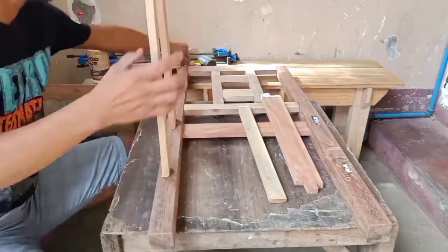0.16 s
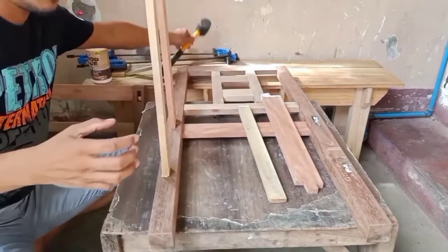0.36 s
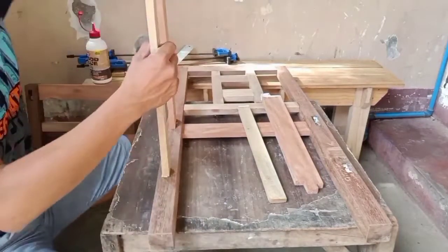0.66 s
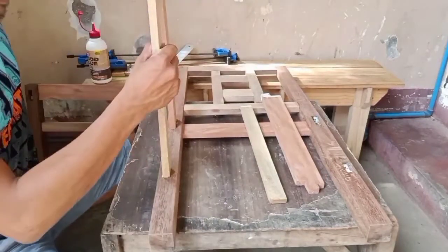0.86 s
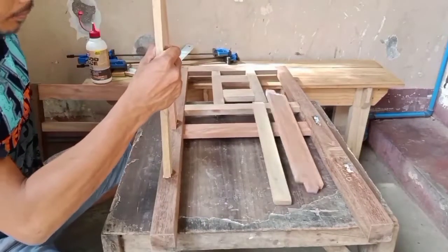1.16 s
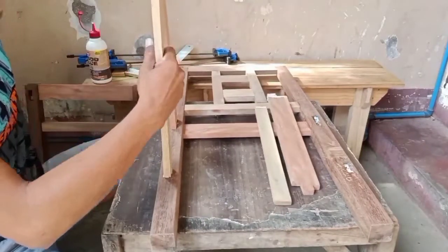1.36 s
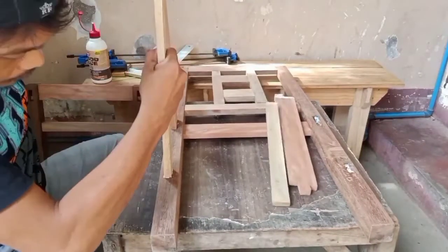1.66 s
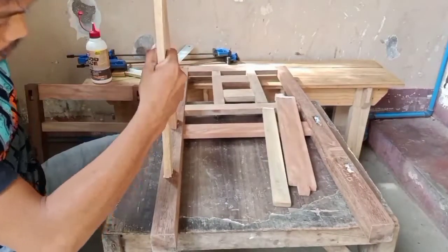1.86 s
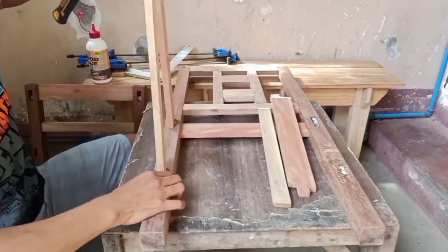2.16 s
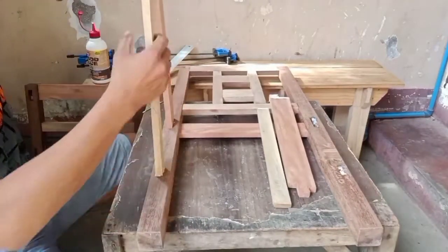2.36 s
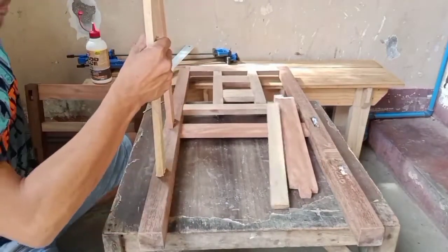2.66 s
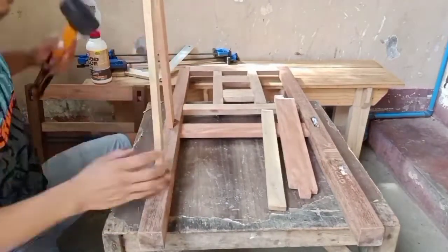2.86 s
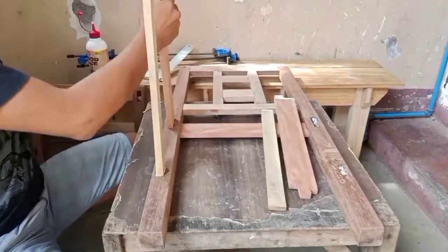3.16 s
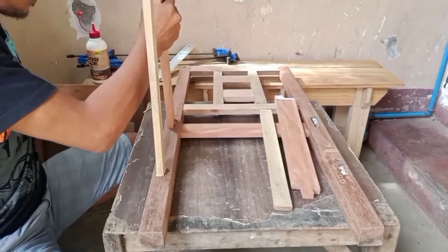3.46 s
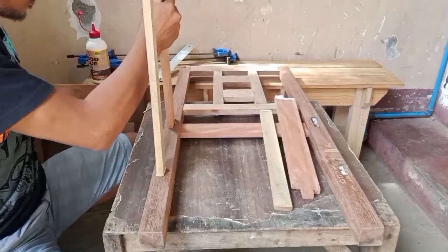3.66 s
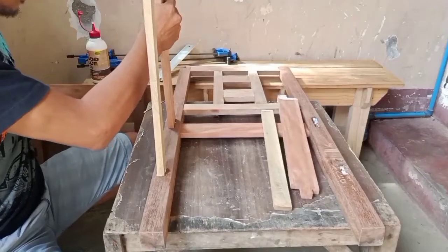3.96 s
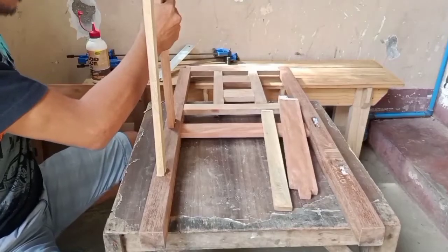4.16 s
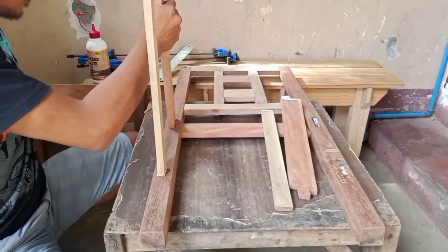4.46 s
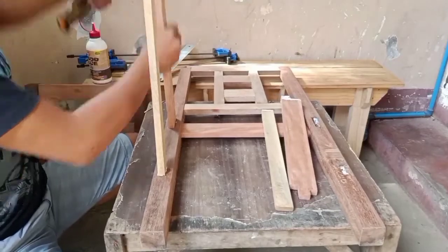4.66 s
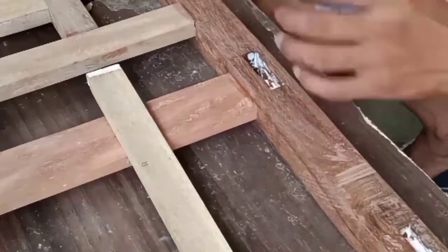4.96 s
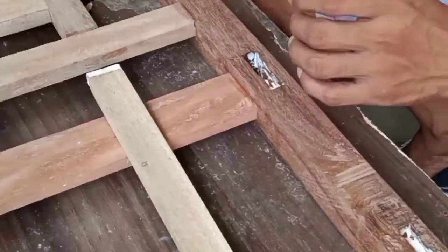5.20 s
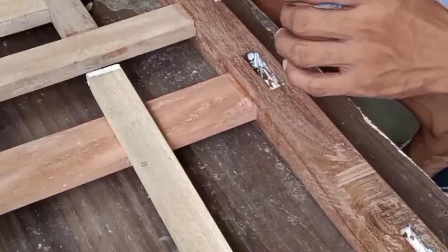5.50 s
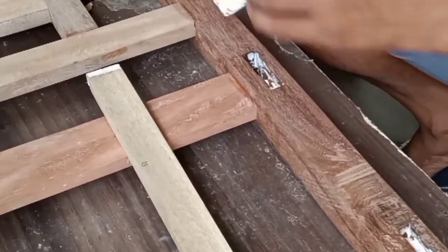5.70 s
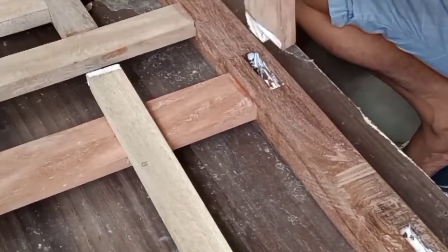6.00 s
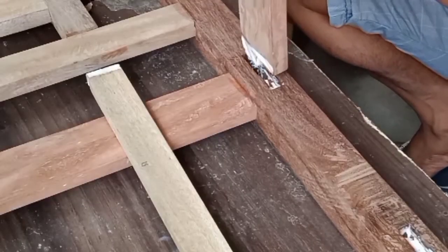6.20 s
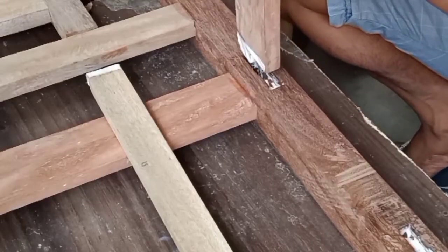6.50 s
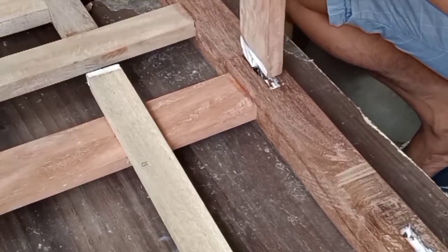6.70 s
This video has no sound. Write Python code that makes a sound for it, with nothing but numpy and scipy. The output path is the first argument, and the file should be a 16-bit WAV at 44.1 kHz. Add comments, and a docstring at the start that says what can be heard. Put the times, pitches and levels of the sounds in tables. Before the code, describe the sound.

Hard mallet knocks drive a wooden leg into its joint on a workbench, dry and clipped, over a faint machine whir and low rumble.

```python
"""A machine whirs outside over a low rumble: shaped noise, and noise ringing in wavering motor tones.
A mallet clinks as it is lifted from among steel tools: tiny contacts ring the steel and knock the handle.
It then drives a wooden upright into its mortise on a workbench in a small workshop: frame modes, a thump
and impact noise crack; short pitched pings and dense wooden clatter, cut short, join; the frame booms twice.
The hardest blows overload the input; after the last, the background drops away and fades back in."""
import sys
import numpy as np
from scipy import signal
from scipy.fft import rfft, irfft
from scipy.io import wavfile

SR = 44100
rng = np.random.default_rng(int(sys.argv[2]) if len(sys.argv) > 2 else 0)


def output_pcm(signal):
    """Save a mono or channel-first signal as 16-bit PCM at the path in sys.argv[1].

    Samples are clipped to [-1, 1] before scaling.
    """
    pcm = np.clip(np.atleast_2d(signal).T, -1, 1) * 32767
    wavfile.write(sys.argv[1], SR, np.round(pcm).astype(np.int16))


N = 301643  # length in samples

# background levels over time, before the late dip: time_s, machine_db, rumble_db
BACKGROUND_LEVELS = [(0.0, -41, -45.5), (0.25, -40, -48.5), (0.49, -39.5, -45.5), (0.74, -40.5, -38.5),
                     (1.23, -43, -36), (1.44, -48.5, -45.5), (1.66, -43.5, -43.5), (1.82, -42.5, -42.5),
                     (2.23, -40.5, -37.5), (2.41, -39.5, -35.5), (3.0, -44, -38), (3.2, -41, -36.5),
                     (3.5, -40.5, -35), (3.72, -44.5, -39), (3.89, -41.5, -36.5), (4.62, -43.5, -37),
                     (5.04, -44, -38.5), (5.06, -41, -48), (5.5, -41.5, -45.5), (6.84, -41.5, -46.5)]
# lower rush of the machine: frequency_hz, level_db_per_hz
LOWER_RUSH = [(8.8, -52), (15, -17), (123, -9), (484, -4.5), (574, -2.5), (1030, -8), (1180, -11.5),
              (1400, -18.5), (1820, -55.5), (3080, -120)]
# upper rush of the machine: frequency_hz, level_db_per_hz
UPPER_RUSH = [(760, -33), (1300, -0.5), (1430, 1.5), (1890, -2.5), (2290, -1.5), (2810, -8), (4260, -8.5),
              (5300, -45.5), (6890, -68), (11700, -120)]
# wavering motor tones: pitch_hz, width_hz (of the narrower of two resonances), level_db
MOTOR_TONES = [(581.6, 19, 4), (1179.5, 34.5, -2.5), (1900, 108, -12.5), (2684, 160, -13),
               (3450, 85, -19.5), (3880, 13, -14.5)]
# low rumble: frequency_hz, level_db_per_hz
RUMBLE_SPECTRUM = [(12, -53), (20, -34.5), (37, -27.5), (64, -16.5), (129, 1), (182, -9.5), (282, -12.5),
                   (400, -20.5), (520, -18), (880, -120)]
DIP_START_S, DIP_DB, FADE_IN_S = 5.05, -12, 0.16

# steel tools scraping and clinking, before a common lift: start_s, length_s, level_db, swell_db_per_s
TOOL_CLINKS = [(.308, .015, -64, -300), (.332, .05, -45.5, -500), (.432, 0.042, -59, -150),
               (.474, .045, -58.5, -100), (.551, 0.033, -43, 170), (.603, 0.045, -38.5, -8),
               (2.54, .03, -65, -100)]
# ringing modes of the steel tools: pitch_hz, width_hz, level_db (relative)
STEEL_MODES = [(2100, 24, -13), (2680, 17, 7.5), (3280, 43, -14), (3820, 8, 13), (5100, 36, -11),
               (6240, 55, -33), (8350, 61, -7), (8340, 150, -13), (9150, 84, -24), (10900, 59, -16),
               (11600, 57, -17), (13700, 190, -28)]
# scrape of the tools: frequency_hz, level_db_per_hz
SCRAPE_SPECTRUM = [(880, -6), (1500, 2.5), (1670, -20), (2040, 0), (3170, 1), (3510, 5), (5560, -18.5),
                   (8370, -10), (15000, -42), (16400, -51)]
# the mallet handle knocking the bench: start_s, length_s, level_db
HANDLE_KNOCKS = [(0.333, .006, -31), (0.432, 0.0036, -31), (0.477, 0.0069, -37), (0.593, 0.059, -17)]
# resonances of the handle: pitch_hz, width_hz (widened about threefold in use), level_db
HANDLE_MODES = [(552, 49, 4), (820, 78, 0.5), (1640, 71, -8)]
CLINK_RISE_S, CLINK_STOP_DB_PER_S = 0.0029, 1600
KNOCK_RISE_S, KNOCK_SAG_DB_PER_S, KNOCK_STOP_DB_PER_S = 0.0017, 152, 800

# the bench frame booming on after two blows: start_s, length_s, level_db
FRAME_BOOMS = [(1.026, .06, -19), (3.617, 0.05, -18.5)]
BOOM_HZ, BOOM_RISE_S, BOOM_SAG_DB_PER_S, BOOM_STOP_DB_PER_S = 208, 0.0083, 154, 902

# dense wooden clatter after a blow: start_s, length_s, level_db, brightness_db (re level), dulling_db_per_s
WOODEN_CLATTER = [(0.994, 0.065, -21, -3.5, 198), (1.166, 0.058, -21, -6, 148),
                  (1.339, 0.091, -20.5, -10.5, 42), (1.618, 0.017, -24, -23, 151),
                  (1.781, 0.037, -18.5, -1.5, 300), (1.83, 0.078, -20, -10.5, 60),
                  (1.94, 0.041, -20.5, -10, 350), (2.827, 0.066, -19.5, -9.5, 198),
                  (2.908, 0.048, -21.5, -14, 60), (3.383, 0.038, -20.5, -21, 250),
                  (3.568, 0.038, -19, -5.5, 120), (3.623, 0.038, -23, -15, 120),
                  (3.77, 0.041, -27, -16, 298), (3.92, 0.086, -22, -4, 226), (4.151, 0.071, -22, -6, 200),
                  (4.308, 0.028, -35.5, -14, 0), (4.355, 0.087, -20.5, -5.5, 180),
                  (4.568, 0.083, -18.5, -5.5, 183), (4.78, 0.057, -24, -3.5, 280)]
CLATTER_RISE_S, CLATTER_SAG_DB_PER_S = 0.01, 27.5
LOW_STOP_DB_PER_S, BRIGHT_STOP_DB_PER_S = 649, 1000

# short pitched pings with some blows and rebounds: start_s, pitch_hz, level_db
PITCHED_PINGS = [(1.18, 2240, -10), (1.377, 2285, -25), (1.832, 2880, -14.5), (2.863, 3020, -5.5),
                 (2.911, 1830, -19)]
PING_RISE_S, PING_T60_S = 0.0027, 0.047

# mallet blows and rebounds: start_s, level_db, upper_body_db, crack_db, tick_db (these three re level,
# before the fixed balance of the parts), length_s (each part lasts its own share), thump_hz
MALLET_BLOWS = [(0.99, 3, -4, -6, -36.5, 0.035, 343), (1.156, 0.5, -8.5, -7.5, -37, 0.035, 296),
                (1.182, -3, -20, -7, -31.5, 0.035, 408), (1.341, -11, 0, -5.5, -29.5, 0.046, 223),
                (1.378, -17.5, -3, 4.5, -43, 0.061, 285), (1.412, -10, -1.5, -10, -52, 0.036, 292),
                (1.615, -13.5, -24, -35, -59, 0.075, 195), (1.776, 6, -9.5, -9.5, -29, 0.042, 267.6),
                (1.836, -16, -12, 7, -42, 0.036, 280), (1.864, -4, -1, -19, -51, 0.024, 284),
                (1.946, -8.5, -16, -7.5, -53, 0.04, 223), (2.321, -25.5, -7, -14, -32, 0.13, 299),
                (2.815, 6.5, 3, -2, -22.5, 0.038, 254), (2.853, -13, 4, 5.5, -41, 0.05, 290),
                (2.912, -12, -9, -15.5, -54, 0.063, 319), (3.378, -6, -19, -19, -52, 0.088, 274),
                (3.553, 12.5, -4.5, -11, -29, 0.039, 267), (3.618, -2, -1, -8.5, -49, 0.023, 312),
                (3.764, -12, -7.5, -13.5, -53, 0.063, 267), (3.91, -0.5, -4, -6, -31, 0.076, 288.5),
                (3.981, -11.5, -25, -34, -56, 0.089, 323), (4.139, 1.5, -5.5, -10.5, -33.5, 0.047, 278),
                (4.211, -17, -27, -31, -47, 0.08, 374), (4.351, 1, -7.5, -12, -31.5, 0.06, 264),
                (4.401, -8.5, -17, -30, -43, 0.061, 301), (4.571, 3, -3, -10, -29.5, 0.043, 294),
                (4.769, -1.5, -7, -13.5, -36, 0.062, 296)]
# modes of the wooden frame, before random shifts: pitch_hz, level_db
FRAME_MODES = [(490, -2.5), (610, -17.5), (740, -2.5), (900, -3.5), (1070, -9.5), (1260, -10), (1370, -5.5)]
# small impacts on the bench top: frequency_hz, level_db_per_hz
BENCH_SPECTRUM = [(25, -33.5), (93, -10), (299, -1.5), (401, -8.5), (492, -1.5), (576, -6), (1330, -15),
                  (1740, -14), (3060, -18), (4200, -26.5), (5000, -49), (7000, -72)]
# treble tick of small impacts: frequency_hz, level_db_per_hz
TICK_SPECTRUM = [(3500, -37), (4800, -3.5), (6000, -11), (8300, -2.5), (10000, -14), (14500, -23),
                 (15600, -28), (16400, -46.5)]

# microphone hiss: frequency_hz, level_db_per_hz (relative)
HISS_SPECTRUM = [(2820, -24.5), (4800, 0.5), (5950, -12.5), (8100, -2.5), (9950, -10.5), (13700, -11.5),
                 (15200, -20.5), (16400, -35)]
HISS_DB, BAND_LIMIT_HZ = -74, 16400


def gain_of(db):
    """Decibels to gain."""
    return 10 ** (np.asarray(db) / 20)


def evened(x):
    """Scales x to an RMS level of 1."""
    return x / np.sqrt(np.mean(x ** 2) + 1e-20)


def coloured(x, points):
    """Filters x by a spectrum of (Hz, dB) points, joined on a log frequency scale; RMS level 1."""
    point_hz, point_db = np.transpose(points)
    hz = np.fft.rfftfreq(len(x), 1 / SR)
    db = np.interp(np.log(hz + 1), np.log(point_hz + 1), point_db)
    return evened(irfft(rfft(x) * gain_of(db), len(x)))


def dulled(x, hz):
    """Takes off the treble above hz with a fourth-order low-pass."""
    return signal.sosfilt(signal.butter(4, hz, fs=SR, output="sos"), x)


def resonate(x, hz, width):
    """One resonance of peak gain near 1: a decaying complex pole, wider when more damped."""
    pole = np.exp((2j * np.pi * hz - np.pi * width) / SR)
    return 2 * signal.lfilter([1 - abs(pole)], [1, -pole], x).real


def contacts(per_s, spread_db):
    """A dense random train of tiny impacts of uneven size and either sign."""
    size = gain_of(spread_db * np.minimum(rng.exponential(1, N), 4))
    sign = rng.choice([-1., 1.], N)
    return size * sign * (rng.random(N) < per_s / SR)


def bursts(rows, rise_s, stop_db_per_s):
    """Gain over time from (start, length, dB, dB per s) rows: a rise, a sloping hold, then a quick stop."""
    gain = np.zeros(N)
    for start_s, length_s, db, slope_db_per_s in rows:
        t = np.arange(round(length_s * SR) + SR // 8) / SR
        hold_db = db + slope_db_per_s * np.minimum(t, length_s)
        stop_db = stop_db_per_s * np.maximum(t - length_s, 0)
        gain[round(start_s * SR):][:len(t)] += gain_of(hold_db - stop_db) * np.minimum(t / rise_s, 1)
    return gain


def background():
    """Rushing air with noise-fed, fuzzy motor tones, and a lumpy low rumble."""
    upper, lower, tones, low = rng.standard_normal((4, N))
    whir = sum(gain_of(db) * resonate(resonate(tones, hz, width), hz, 2.4 * width)
               for hz, width, db in MOTOR_TONES)
    rush = coloured(lower, LOWER_RUSH) + gain_of(-4.5) * coloured(upper, UPPER_RUSH)
    machine = evened(rush + gain_of(-2) * evened(whir))
    rumble = coloured(low, RUMBLE_SPECTRUM)

    time_s, machine_db, rumble_db = np.transpose(BACKGROUND_LEVELS)
    t = np.arange(N) / SR
    dip_db = DIP_DB * (t > DIP_START_S) * np.clip(1 - (t - DIP_START_S) / FADE_IN_S, 0, 1)
    machine_gain = gain_of(np.interp(t, time_s, machine_db) + dip_db)
    rumble_gain = gain_of(np.interp(t, time_s, rumble_db) + dip_db)
    return machine_gain * machine + rumble_gain * rumble


def clinks():
    """Scraping contacts ring the steel tools' narrow modes and the mallet handle's broad ones."""
    x = contacts(per_s=3000, spread_db=2.5)
    ringing = sum(gain_of(db) * np.sqrt(width) * evened(resonate(x, hz, width))
                  for hz, width, db in STEEL_MODES)
    scrape = coloured(x, SCRAPE_SPECTRUM)
    steel = gain_of(12.5) * evened(evened(ringing) + gain_of(4.5) * scrape)
    handle = evened(sum(gain_of(db) * resonate(resonate(x, hz, 3.6 * width), hz, 3 * width)
                        for hz, width, db in HANDLE_MODES))

    knock_rows = [row + (-KNOCK_SAG_DB_PER_S,) for row in HANDLE_KNOCKS]
    knock_gain = bursts(knock_rows, KNOCK_RISE_S, KNOCK_STOP_DB_PER_S)
    clink_gain = bursts(TOOL_CLINKS, CLINK_RISE_S, CLINK_STOP_DB_PER_S)
    return knock_gain * handle + clink_gain * steel


def booms():
    """A low ring of the bench frame: one sine that sags, then stops."""
    rows = [row + (-BOOM_SAG_DB_PER_S,) for row in FRAME_BOOMS]
    gain = bursts(rows, BOOM_RISE_S, BOOM_STOP_DB_PER_S)
    return gain * np.sqrt(2) * np.sin(2 * np.pi * BOOM_HZ * np.arange(N) / SR)


def wood(per_s, spread_db):
    """Small impacts on the bench top: thud below 1.5 kHz, crack above it, and a treble tick."""
    x = contacts(per_s, spread_db)
    impacts = rfft(coloured(x, BENCH_SPECTRUM))
    low = 1 / (1 + (np.fft.rfftfreq(N, 1 / SR) / 1500) ** 8)
    thud = evened(irfft(impacts * low, N))
    crack = evened(irfft(impacts * (1 - low), N))
    return thud, crack, coloured(x, TICK_SPECTRUM)


def clatter():
    """Dense wooden clatter of small impacts after a blow: held, mostly dulling, then cut short."""
    thud, crack, tick = wood(per_s=3500, spread_db=2.5)
    low_rows, bright_rows = [], []
    for start_s, length_s, db, brightness_db, dulling_db_per_s in WOODEN_CLATTER:
        low_rows.append((start_s, length_s, db, -CLATTER_SAG_DB_PER_S))
        bright_rows.append((start_s, length_s, db + brightness_db, -dulling_db_per_s))
    low_gain = bursts(low_rows, CLATTER_RISE_S, LOW_STOP_DB_PER_S)
    bright_gain = bursts(bright_rows, CLATTER_RISE_S, BRIGHT_STOP_DB_PER_S)
    return low_gain * thud + bright_gain * (crack + gain_of(-28) * dulled(tick, 9500.0))


def pings():
    """Short pitched pings, each one sine that rises softly and dies exponentially."""
    out, t = np.zeros(N + SR), np.arange(SR // 8) / SR
    for start_s, pitch_hz, db in PITCHED_PINGS:
        ring = np.sin(2 * np.pi * pitch_hz * t) * np.tanh(t / PING_RISE_S) ** 2
        out[round(start_s * SR):][:len(t)] += ring * gain_of(db - 60 * t / PING_T60_S)
    return out[:N]


def blows():
    """Frame modes, a thump and impact noise: each swells in milliseconds, then falls away ever faster."""
    noises = wood(per_s=3300, spread_db=-0.5)
    out, t = np.zeros(N + SR), np.arange(SR // 8) / SR
    mode_hz, mode_db = np.transpose(FRAME_MODES)[..., None]
    upper = np.clip(mode_hz / 600 - .7, 0, 1)  # how far a mode belongs to the upper body
    chance = rng.random((len(MALLET_BLOWS), 3, len(FRAME_MODES), 1))

    for row, (phase, shift, strength) in zip(MALLET_BLOWS, chance):
        start_s, db, upper_db, crack_db, tick_db, length_s, thump_hz = row
        at = round(start_s * SR)
        # each noise is levelled over its first 900 samples
        thud, crack, tick = (x[at:at + len(t)] / np.sqrt(np.mean(x[at:at + 900] ** 2)) for x in noises)

        # every blow lands a little differently: mode strengths and pitches vary
        struck_gain = gain_of(mode_db + upper * (upper_db + 3.5) + 9.6 * (strength - .5))
        struck_hz = mode_hz * (1 + 0.11 * (shift - .5))
        modes = (struck_gain * np.sin(2 * np.pi * (struck_hz * t + phase))).sum(0)
        thump = np.sin(2 * np.pi * (thump_hz * t + phase[0]))

        # sound, level dB, rise s, share of the length
        parts = ((thud, -9.0, .003, 1.1),
                 (modes, -8.0, .003, 1.05),
                 (thump, -5.0, .004, 1.2),
                 (crack, crack_db - 4.5, .002, .9),
                 (tick, tick_db - 4.0, .002, .75))
        for x, level_db, rise_s, share in parts:
            fall_db = 60 * (t / (share * length_s)) ** 1.264
            rise = np.tanh(t / rise_s) ** 2
            out[at:at + len(t)] += x * gain_of(db + level_db - fall_db) * rise
    return out[:N]


def room(x):
    """A short tail of random reflections from the near walls, from 4 ms on, falling 60 dB in 93 ms."""
    t = np.arange(SR // 4) / SR
    tail = dulled(rng.standard_normal(len(t)), 14000.0) * gain_of(-60 * t / 0.093) * (t > .004)
    return signal.fftconvolve(x, tail / np.linalg.norm(tail))[:N]


def scene():
    """Bench sounds with their room, over the background."""
    behind = background()
    near = clinks() + booms() + clatter() + pings() + blows()
    return (behind + near + gain_of(-16.5) * room(near))[None]


def record(dry):
    """Microphone hiss joins; the input overloads with a firm knee at full scale; then the band limit."""
    loud = dry + gain_of(HISS_DB) * coloured(rng.standard_normal(N), HISS_SPECTRUM)
    clipped = loud / (1 + np.abs(loud) ** 5) ** (1 / 5)
    low_pass = signal.firwin(511, BAND_LIMIT_HZ, window=("kaiser", 9), fs=SR)
    return signal.oaconvolve(clipped, low_pass[None], "same")


dry = scene()
out = record(dry)
output_pcm(out)
```